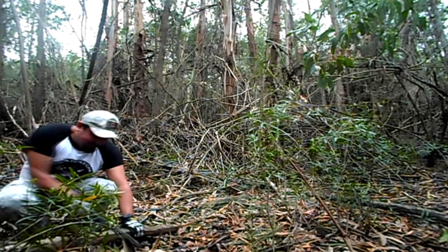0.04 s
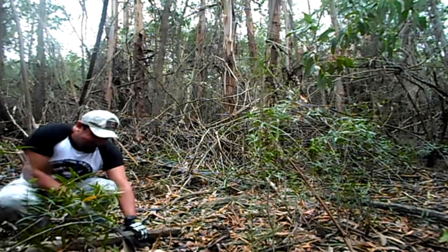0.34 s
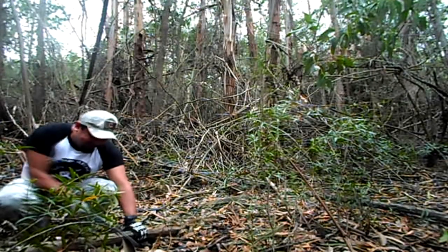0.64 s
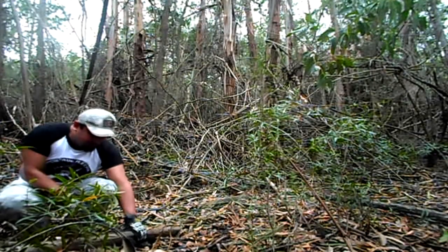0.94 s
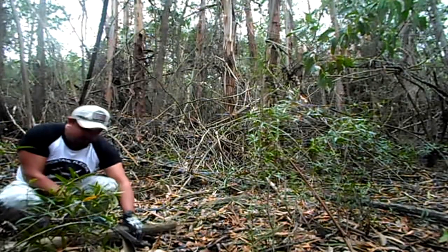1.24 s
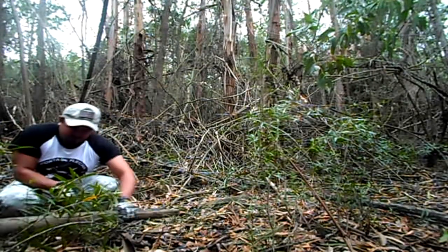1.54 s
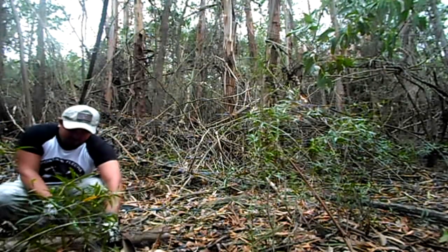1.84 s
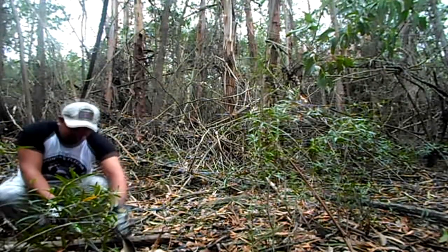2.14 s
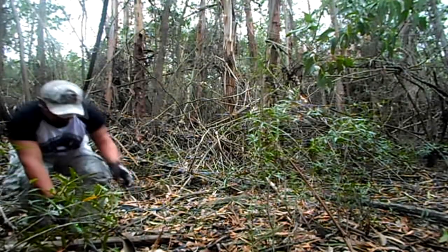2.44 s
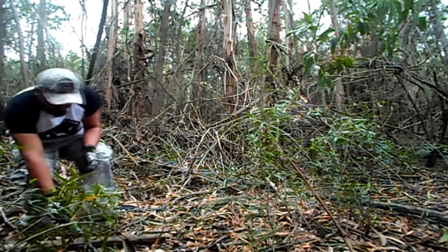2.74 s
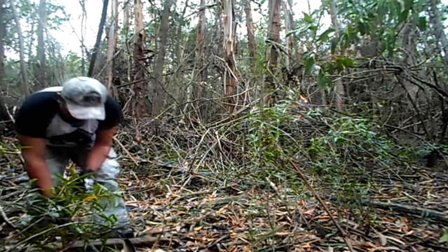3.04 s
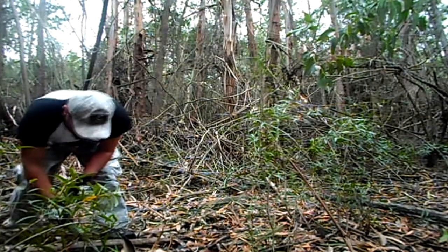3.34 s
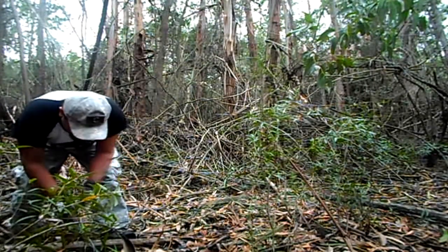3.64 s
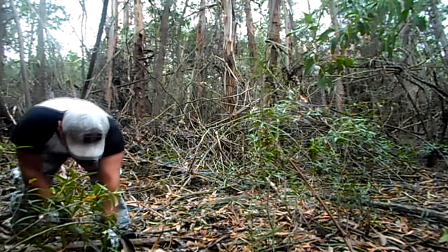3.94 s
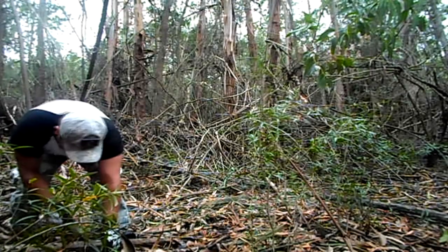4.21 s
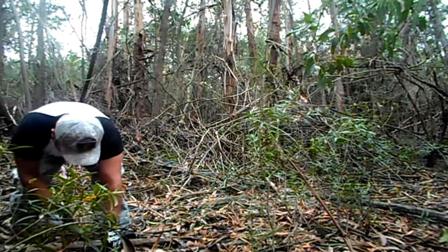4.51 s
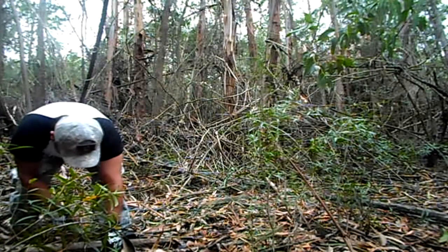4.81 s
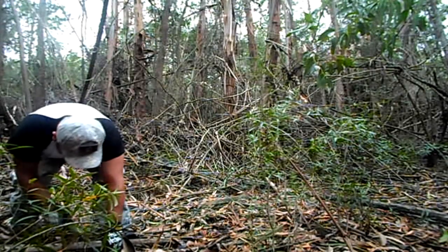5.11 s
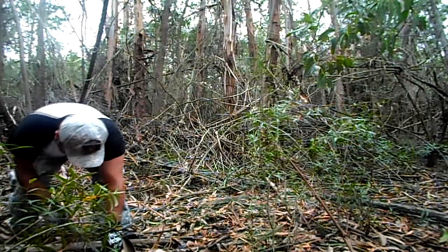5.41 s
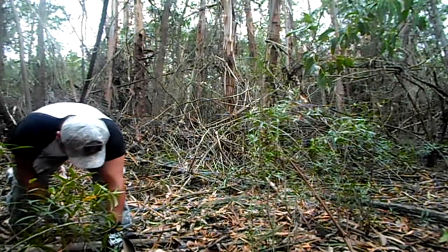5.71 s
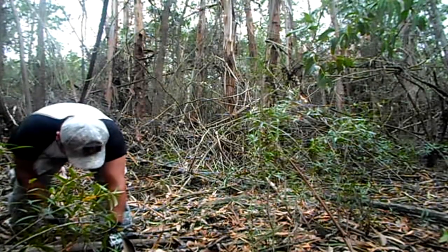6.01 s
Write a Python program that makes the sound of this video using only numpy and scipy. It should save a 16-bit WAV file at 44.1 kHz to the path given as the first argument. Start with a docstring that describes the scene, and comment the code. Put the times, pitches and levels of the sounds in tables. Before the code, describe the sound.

Quick rasping hand saw strokes stop, dry leaves stir, a branch snaps loudly, and the sawing resumes above faint forest air and soft microphone thumping.

```python
"""Sawing a branch in the forest

A hand saw cuts in two runs of quick strokes. Its teeth tear fibres, which rings the wood and hisses
off the steel; the blade snags, squeaks and bumps in the cut. Between the runs dry leaves rustle and
the branch breaks with one sharp crack, which the trees scatter back. Under it all lie a faint wash
of air and the low hum and soft regular thumps of a camera."""
import sys
import numpy as np
from scipy import signal
from scipy.fft import rfft, irfft, next_fast_len
from scipy.io import wavfile
from scipy.ndimage import map_coordinates

SR = 44100
rng = np.random.default_rng(int(sys.argv[2]) if len(sys.argv) > 2 else 0)


def output_pcm(signal):
    """Save a mono or channel-first signal as 16-bit PCM at the path in sys.argv[1].

    Samples are clipped to [-1, 1] before scaling.
    """
    pcm = np.clip(np.atleast_2d(signal).T, -1, 1) * 32767
    wavfile.write(sys.argv[1], SR, np.round(pcm).astype(np.int16))


N = 267246


def amp(db):
    """Turn decibels into a gain."""
    return 10 ** (np.asarray(db) / 20)


def unit(x):
    """Scale a sound to an average (rms) level of 1."""
    return x / np.sqrt(np.mean(x ** 2) + 1e-20)


def along(points, hz):
    """Read between (Hz, value) points on a logarithmic frequency axis."""
    freqs, values = np.transpose(points)
    return np.interp(np.log(hz + 1), np.log(freqs), values)


def filtered(x, response):
    """Filter a sound; response gives the gain at each frequency."""
    size = next_fast_len(len(x) + 4096)
    return irfft(rfft(x, size) * response(np.fft.rfftfreq(size, 1 / SR)), size)[:len(x)]


def coloured(x, spectrum):
    """Shape a sound with (Hz, dB) points, then scale it to level 1."""
    return unit(filtered(x, lambda hz: amp(along(spectrum, hz))))


def resonances(modes, hz):
    """The response of something that rings at (Hz, width in Hz, dB) peaks."""
    return sum(amp(db) * 1j * hz * width / (peak * peak - hz * hz + 1j * hz * width)
               for peak, width, db in modes)


def tilt(hz, slope_db):
    """Brighten or dull by slope_db per octave."""
    return amp(slope_db * np.log2(np.clip(hz, 300, 12000) / 1000))


def wobble(n, rate):
    """A smooth random curve through rate points a second."""
    return map_coordinates(rng.standard_normal(int(n * rate / SR) + 4), [np.arange(n) * rate / SR])


def grains(rate, spread_db):
    """Random clicks of uneven size; rate holds the clicks per second at each sample."""
    n = len(rate)
    return (rng.random(n) < rate / SR) * rng.standard_normal(n) * amp(spread_db * rng.standard_normal(n))


def swells(rows):
    """A level curve with one smooth hump for each (seconds, half length, dB) row."""
    t = np.arange(N) / SR
    return sum(amp(db) * np.exp(-((t - s) / half) ** 2) for s, half, db in rows)


def during(start, end):
    """1 between two times and 0 outside, with soft edges."""
    t = np.arange(N) / SR
    return np.clip(np.minimum(t - start, end - t) / .1, 0, 1)


def add(track, s, sound):
    """Mix a sound into the track at s seconds."""
    i = int(np.clip(round(s * SR), 0, N))
    track[i:i + len(sound)] += sound[:N - i]


# Each row: start in seconds, length in seconds, level in dB, dullness in dB per octave, push or pull.
SAW_STROKES = [(0.052, 0.13, -45, 0, "push"), (0.22, 0.13, -41, 0.5, "pull"),
               (0.383, 0.15, -42.5, -0.5, "push"), (0.566, 0.11, -43, 1.5, "push"),
               (0.693, .129, -41.5, 3, "pull"), (0.848, 0.12, -44, 0, "push"),
               (1.002, 0.13, -44.5, 4.5, "pull"), (1.16, 0.15, -51, 0, "push"),
               (4.114, .19, -55, 0.5, "pull"), (4.321, 0.14, -53, -2, "pull"), (4.477, .14, -51, 0, "push"),
               (4.625, 0.11, -52, -.5, "push"), (4.745, 0.13, -48, -0.5, "pull"),
               (4.9, 0.12, -49.5, 1.5, "push"), (5.029, 0.13, -49, 0, "pull"),
               (5.189, 0.11, -53, 1.5, "push"), (5.31, 0.14, -50, 1, "pull"),
               (5.469, 0.11, -50.5, -1.5, "push"), (5.597, .127, -46.5, 1, "pull"),
               (5.747, 0.12, -50, -1, "push"), (5.881, 0.13, -46, 0, "pull"),
               (6.024, 0.12, -52.5, 3, "push")]
# How the wood rings in each cut. Each row: pitch in Hz, width in Hz, level in dB.
FIRST_RING = [(559, 24, 0), (788, 83, 3), (1110, 310, -5), (1335, 190, 3), (1577, 140, 0.5),
              (1904, 190, -0.5), (2198, 130, -5), (2750, 160, -8.5), (2910, 150, -4)]
SECOND_RING = [(620, 27, -10), (752, 110, 5), (878, 140, 2.5), (1270, 130, 4), (1964, 200, -0.5),
               (2426, 360, -1.5), (2945, 170, -3)]
# The hiss of the teeth in each cut. Each row: frequency in Hz, level in dB.
FIRST_TEETH = [(150, 2), (500, -9.5), (1200, -1), (3300, 0), (3700, -7.5), (4400, -1), (5800, -7.5),
               (7500, -8), (9600, -3.5), (12000, -8)]
SECOND_TEETH = [(150, -16), (500, -11), (1600, -2.5), (3300, -2), (3700, -2.5), (4500, 2), (5600, -7.5),
                (7200, -7.5), (9600, -3.5), (12000, -8)]
def saw(strokes, wood, hiss, wood_db, hiss_db, shudder_db, swell_db, bite_db):
    """Teeth tear more fibres as the blade speeds up; the tears ring the wood and hiss off the steel."""
    out, t = np.zeros(N), np.arange(SR // 4) / SR
    for start, length, db, dullness, direction in strokes:
        fastest_s = length * (0.66 if direction == "pull" else 0.47)
        speed = np.abs(np.sin(np.pi * np.interp(t, [0, fastest_s, length], [0, .5, 1])))
        force = np.tanh(1.287 * speed ** 1.2)  # levels off once the teeth are in
        bite = amp(bite_db * wobble(len(t), 176.4))  # the teeth catch and let go
        tears = lambda: grains(4000 + 7000 * speed, spread_db=2.5) * bite
        modes = [(hz, width, level + rng.normal(0, 2.05)) for hz, width, level in wood]
        ring = unit(filtered(tears(), lambda hz: resonances(modes, hz) * tilt(hz, -dullness)))
        bend = shudder(tears())
        steel = coloured(tears(), hiss)
        lateness = np.clip((t - fastest_s) / length, -1, 1)  # the ring gains level through the stroke
        effort_db = db + 50  # an ordinary stroke is -50 dB
        add(out, start, amp(db + wood_db + swell_db * lateness) * force ** 1.22 * ring)
        add(out, start, amp(shudder_db + 0.93 * effort_db) * force ** 1.05 * bend)
        add(out, start, amp(hiss_db + 0.56 * effort_db - 0.56 * dullness) * force * steel)
    return out


# The low notes of the bending branch. Each row: pitch in Hz, width in Hz, level in dB.
BENDING_NOTES = [(136, 68, 5.5), (285, 47, -1)]
def shudder(tugs):
    """Small tugs bend the whole branch, which shakes at its low notes."""
    return unit(filtered(tugs, lambda hz: resonances(BENDING_NOTES, hz) / (1 + 1j * hz / 500)))


def rubbing(strokes, hiss, level_db):
    """The side of the blade rubs faintly through a whole cut, even as it turns round."""
    scrape = coloured(grains(np.full(N, 6000), spread_db=0), hiss) * amp(4.2 * wobble(N, 25))
    start, end = strokes[0][0], strokes[-1][0] + strokes[-1][1]
    return amp(level_db) * during(start, end) * scrape


# Each row: start in seconds, length in seconds, first pitch in Hz, last pitch in Hz, level in dB.
BLADE_SQUEAKS = [(1.011, 0.011, 5230, 5330, -60.5), (4.178, 0.02, 4800, 3900, -56),
                 (4.817, 0.011, 4380, 4870, -45.5), (5.097, .028, 3940, 4950, -59),
                 (5.658, 0.013, 4250, 4360, -49.5), (5.672, 0.021, 5150, 5100, -55)]
def squeaks():
    """The side of the blade sticks and slips in the cut at a rough, gliding pitch."""
    out = np.zeros(N)
    for start, length, from_hz, to_hz, db in BLADE_SQUEAKS:
        n = int(length * SR)
        hz = np.linspace(from_hz, to_hz, n) * (1 + .035 * wobble(n, 1500))
        grip = np.sqrt(np.hanning(n)) * amp(5.1 * wobble(n, 640))
        add(out, start, amp(db + 6.5) * grip * np.sin(2 * np.pi * np.cumsum(hz) / SR))
    return out


# Each row: start in seconds, level in dB.
TOOTH_SNAGS = [(0.0663, -35), (.393, -32), (0.3995, -25), (0.4134, -19.5), (4.149, -37), (4.608, -39.5)]
# The tone of a snag. Each row: frequency in Hz, level in dB.
SNAG_TONE = [(500, -12), (1000, -3), (1600, 4), (2200, -0.5), (3700, 4), (6000, -9), (12000, -6)]
def snags(fade_s):
    """A caught tooth tears free with a dry crack that falls 60 dB in fade_s seconds."""
    out, t = np.zeros(N), np.arange(SR // 20) / SR
    attack = np.clip(t / 0.00029, 0, 1)
    for start, db in TOOTH_SNAGS:
        crack = coloured(rng.choice([-1.0, 1.0], len(t)), SNAG_TONE)
        add(out, start, amp(db - 7.5 - 60 * t / fade_s) * attack * crack)
    return out


# One judder: middle in seconds, half length in seconds, level in dB.
BLADE_JUDDER = (5.965, 0.024, -46)
def judder(slip_hz):
    """The blade sticks and slips on the bending branch, which gives a short low growl."""
    cycles = np.cumsum(slip_hz * (1 + .03 * wobble(N, 60))) / SR
    slips = np.diff(np.floor(cycles), prepend=0)  # one click per cycle
    return swells([BLADE_JUDDER]) * shudder(slips)


# Bumps at the ends of strokes. Each row: start in seconds, level in dB, brightness in dB per octave.
BLADE_BUMPS = [(0.3322, -33.5, -7), (4.7174, -33.5, -3.5), (4.9971, -25.5, 0.5), (5.568, -42, -6),
               (5.8416, -26.5, 0.5)]
# The notes of the bumped branch. Each row: pitch in Hz, level in dB.
BUMP_NOTES = [(330, 0), (500, -6.5), (690, 1.5), (930, -6.5), (1120, -10.5), (1500, -15), (1880, -12),
              (2400, -13), (3000, -17)]
def bumps(contact_s, damping_s):
    """The saw jolts the branch: it rings while the blow lasts, then the gripping hand stops it."""
    out, t = np.zeros(N), np.arange(SR // 30) / SR
    fade = amp(-60 * np.maximum(t - contact_s, 0) / damping_s)
    for start, db, brightness in BLADE_BUMPS:
        ring = sum(amp(level) * tilt(hz, brightness) * np.sin(2 * np.pi * (hz * t + rng.random()))
                   for hz, level in BUMP_NOTES)
        add(out, start, amp(db - 6.5) * fade * unit(ring))
    return out


# Wood and twigs snap. Each row: start in seconds, level in dB, brightness in dB per octave.
WOOD_SNAPS = [(0.5644, -25.5, 12.5), (3.1189, -31.5, 2), (3.1977, -40, -2), (3.2177, -8.5, 2.5),
              (3.5777, -31.5, 2.5), (3.7084, -25, 2), (5.0047, -27.5, 3.5)]
# A snap's ringing notes and the tone of its splinters. Each row: frequency in Hz, level in dB.
SNAP_NOTES = [(270, 4.5), (620, 1.5), (1520, -3.5), (2450, -6), (3130, 6), (5170, -1), (6390, -6),
              (7710, 4.5), (8630, -10), (9600, -3)]
SPLINTER_TONE = [(600, 2), (1100, 1), (2500, -2), (8000, 0.5), (14000, 0)]
def snaps(crackle, roughness):
    """A burst of breaking fibres rings the dry wood for a few milliseconds."""
    out, t = np.zeros(N), np.arange(SR // 10) / SR
    loudest_db = max(row[1] for row in WOOD_SNAPS)
    for start, db, brightness in WOOD_SNAPS:
        ring = np.zeros(len(t))
        for hz, level in SNAP_NOTES:
            phase = 2 * np.pi * (hz * t + rng.random())
            blur = roughness * min(hz / 3000, 1) * wobble(len(t), 960)
            ring += amp(level) * np.sin(phase + blur)
        ring = amp(0.39 * (db - loudest_db)) * unit(ring)  # light snaps hardly ring the branch
        splinters = coloured(rng.choice([-1.0, 1.0], len(t)), SPLINTER_TONE)
        crack = unit(filtered(ring + crackle * splinters, lambda hz: tilt(hz, brightness)))
        fade_s = .016 * amp(0.2 * brightness)  # thin bright twigs ring longer
        add(out, start, amp(db - 7.0) * crack * amp(-60 * np.maximum(t - .0006, 0) / fade_s))
    return out


BREAK_S = 3.2178  # the branch gives way, between the two cuts
def recoil(level_db, thud_hz, fade_s):
    """The broken branch springs back with one dead thud."""
    out, t = np.zeros(N), np.arange(SR // 10) / SR
    add(out, BREAK_S, amp(level_db - 60 * t / fade_s) * np.sin(2 * np.pi * thud_hz * t))
    return out


def debris(splinter_db, splinter_fade_s, leaf_db, leaf_fade_s):
    """The break throws splinters and shakes the branch's dry leaves into a brief bright hiss."""
    t = np.maximum(np.arange(N) / SR - BREAK_S, 0)
    tone = [(200, 1), (1500, -6.5), (3200, -5.5), (6000, 1.5), (9300, 5.0), (14000, 4.0)]  # Hz, dB
    hiss = coloured(grains(np.full(N, 7000), spread_db=1), tone)
    level = amp(splinter_db - 60 * t / splinter_fade_s) + amp(leaf_db - 60 * t / leaf_fade_s)
    attack = np.clip(t / 0.0083, 0, 1)
    return level * attack * hiss


# Each row: middle in seconds, half length in seconds, level in dB.
FIBRE_TEARS = [(3.49, 0.0088, -49.5), (3.517, 0.016, -48.5), (3.56, 0.016, -48), (3.68, 0.024, -58.5),
               (3.745, 0.031, -55.5)]
# The tone of tearing wood. Each row: frequency in Hz, level in dB.
FIBRE_TONE = [(150, -7), (700, 0), (1500, -1), (3200, 1), (5500, -5.5), (12000, -3.5)]
def tearing():
    """The cracked branch is twisted and its fibres part in short gritty crunches."""
    return swells(FIBRE_TEARS) * coloured(grains(np.full(N, 4000), spread_db=0.5), FIBRE_TONE)


# Each row: middle in seconds, half length in seconds, level in dB.
LEAF_RUSTLES = [(1.889, 0.014, -54.5), (1.976, 0.054, -57.5), (2.124, 0.03, -61.5), (2.55, 0.017, -64.5),
                (3.135, 0.06, -57), (3.55, 0.13, -57.5), (3.78, 0.071, -65)]
# The tone of dry leaves. Each row: frequency in Hz, level in dB.
LEAF_TONE = [(100, -24), (400, 8.5), (1000, 3.5), (3500, 2), (6000, -2), (10000, -1), (14000, -5.5)]
# The person sawing shifts position: start and end in seconds.
SHIFTING_S = (1.7, 4.2)
def leaves(stir_db):
    """Dry leaves crackle under hands and boots, and stir faintly while the person moves."""
    stir = during(*SHIFTING_S) * amp(stir_db + 4.8 * wobble(N, 11))
    crackles = grains(np.full(N, 4000), spread_db=2.5) * amp(2.7 * wobble(N, 80))
    return (swells(LEAF_RUSTLES) + stir) * coloured(crackles, LEAF_TONE)


# How long the echo lasts. Each row: frequency in Hz, seconds to fade by 60 dB.
ECHO_FADE = [(200, 0.354), (1500, 0.2), (4000, 0.41), (8000, 0.47), (14000, 0.55)]
# What leaves and trunks send back. Each row: frequency in Hz, level in dB.
ECHO_TONE = [(200, -5), (1500, 3), (3200, -3), (6000, -1), (7700, -1), (9100, 2.5), (10200, 1),
             (14000, 1.5)]
def forest_echo(sound, early_db, late_db):
    """The ground and near trunks answer at once; farther trees scatter a thin bright tail."""
    out, size = np.zeros(N), SR // 5
    for i in range(0, N, size):  # a fresh random echo for each piece, as if the source moved
        hz, t, noise = signal.stft(rng.standard_normal(SR * 3 // 4), SR, nperseg=256)
        tail_db = along(ECHO_TONE, hz)[:, None] - 60 * t / along(ECHO_FADE, hz)[:, None]
        tail = signal.istft(noise * amp(tail_db), SR, nperseg=256)[1]
        near = rng.standard_normal(len(tail)) * amp(-60 * np.arange(len(tail)) / SR / 0.059)
        echo = amp(early_db) * near / np.linalg.norm(near) + amp(late_db) * tail / np.linalg.norm(tail)
        add(out, i / SR + .003, signal.fftconvolve(sound[i:i + size], echo))
    return out


# A repeating pattern of accents. Each entry: one thump's change of level in dB.
THUMP_PATTERN = [-8, -1, -7, -16, 0, -5.5, 0, -4.5, 1, -12, -5, 0]
THUMP_GAP_S, FIRST_THUMP_S = .0662974, .0165
def camera(hum_db, thump_db, thump_hz, low_cut_hz):
    """A camera thumps softly at a steady rate, over a wavering hum at twice that rate."""
    thumps, age = np.zeros(N), np.arange(SR // 20) / SR
    pulse = age ** 1.73 * np.exp(-2 * np.pi * thump_hz * age)
    pulse = filtered(pulse, lambda hz: 1j * hz / (low_cut_hz + 1j * hz))
    times = np.arange(FIRST_THUMP_S, N / SR, THUMP_GAP_S)
    for peak_s, accent_db in zip(times, np.resize(THUMP_PATTERN, len(times))):
        start = peak_s - age[pulse.argmax()] + rng.normal(0, 0.00099)
        gain = amp(thump_db + accent_db + rng.normal(0, 0.88))
        add(thumps, start, -gain * pulse / pulse.max())
    t = np.arange(N) / SR
    hum = np.sin(2 * np.pi * 2 * t / THUMP_GAP_S + 0.19 * wobble(N, 16))
    return thumps + hum * amp(hum_db + 0.66 * wobble(N, 9))


# The tone of the forest air. Each row: frequency in Hz, level in dB.
AIR_TONE = [(20, 22), (50, 24.5), (80, 18), (130, 9), (250, 6), (500, 0.5), (800, 0.5), (1300, -4.5),
            (2500, -8.5), (5000, -11.5), (9500, -14.5), (14000, -19)]
def air():
    """The woods give a faint steady wash over a low rumble."""
    return amp(-54) * coloured(rng.standard_normal(N), AIR_TONE) * amp(1.4 * wobble(N, 2.535))


def scene():
    """Saw, branch and leaves echo among the trees, over a steady background."""
    first = [row for row in SAW_STROKES if row[0] < BREAK_S]
    second = [row for row in SAW_STROKES if row[0] > BREAK_S]
    cuts = saw(first, FIRST_RING, FIRST_TEETH,
               wood_db=-2.0, hiss_db=-52.5, shudder_db=-62.5, swell_db=3.0, bite_db=1.6)
    cuts += saw(second, SECOND_RING, SECOND_TEETH,
                wood_db=-2.0, hiss_db=-53, shudder_db=-55, swell_db=2.5, bite_db=1.56)
    blade = rubbing(first, FIRST_TEETH, level_db=-69) + rubbing(second, SECOND_TEETH, level_db=-68.5)
    blade += squeaks() + snags(fade_s=0.023) + judder(slip_hz=151.5)
    branch = bumps(contact_s=0.0045, damping_s=0.01) + snaps(crackle=0.86, roughness=0.92)
    branch += tearing() + recoil(level_db=-34, thud_hz=262, fade_s=0.012)
    litter = leaves(stir_db=-75)
    litter += debris(splinter_db=-29.5, splinter_fade_s=0.11, leaf_db=-39.5, leaf_fade_s=0.5)
    work = cuts + blade + branch + litter
    background = air() + camera(hum_db=-51.0, thump_db=-39.5, thump_hz=185, low_cut_hz=24.5)
    return (work + forest_echo(work, early_db=-15.5, late_db=-15) + background)[None]


# How the microphone shapes the treble. Each row: frequency in Hz, gain in dB.
MICROPHONE_TONE = [(9600, 0.5), (10100, -1.5), (10500, -10), (11100, -21.5), (12000, -6.5), (12700, -13.5),
                   (14000, -24), (15500, -46)]
TOP_HZ = 15900
def record(dry):
    """The microphone's opening cuts a notch in the treble; nothing above TOP_HZ gets through."""
    return filtered(dry[0], lambda hz: amp(along(MICROPHONE_TONE, hz)) * (hz < TOP_HZ))[None]


dry = scene()
out = record(dry)
output_pcm(out)
```